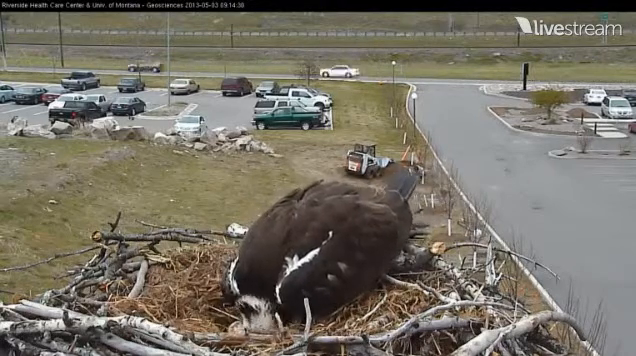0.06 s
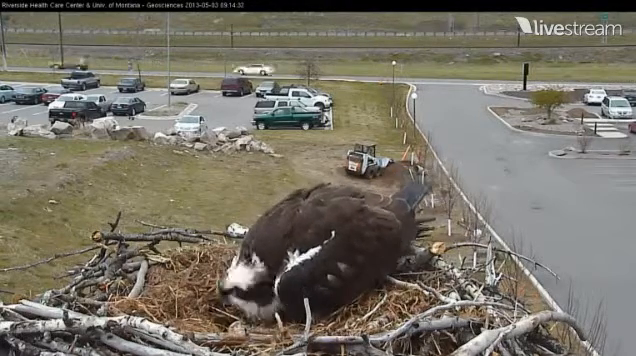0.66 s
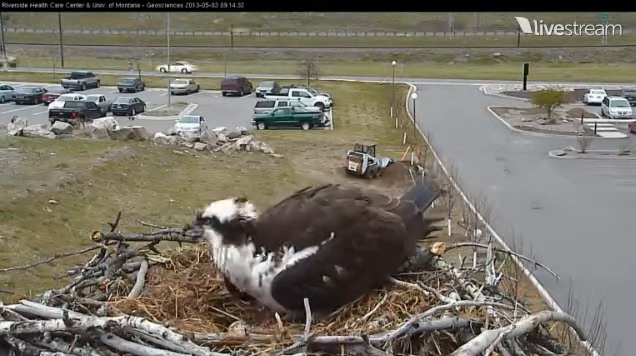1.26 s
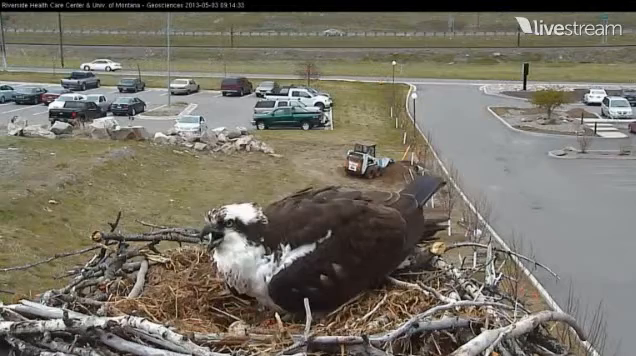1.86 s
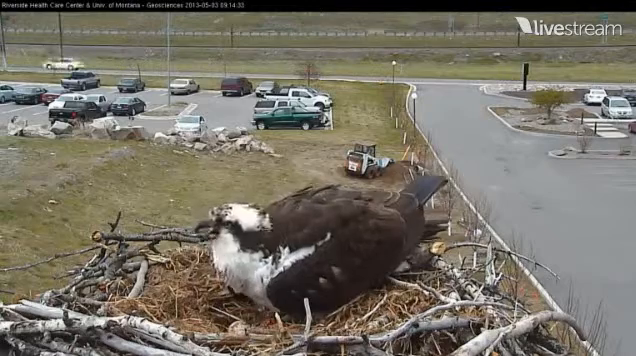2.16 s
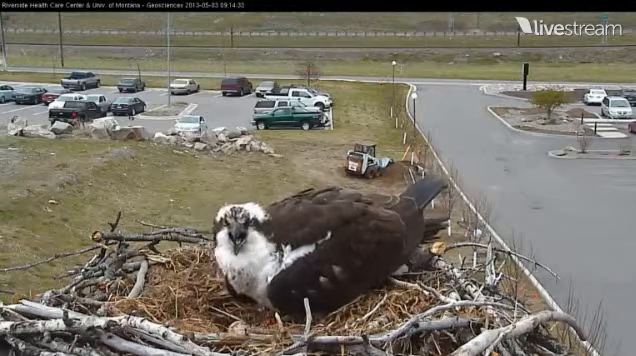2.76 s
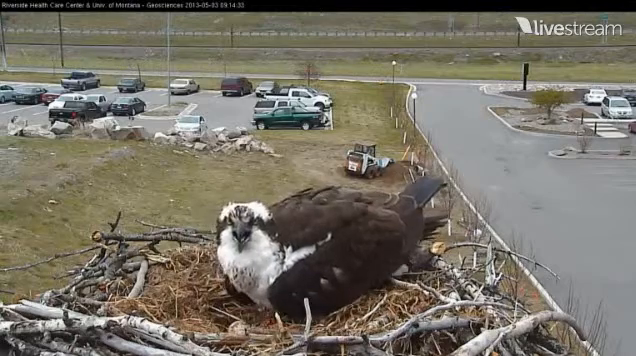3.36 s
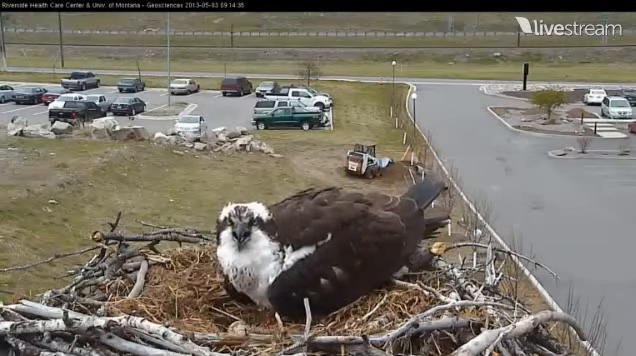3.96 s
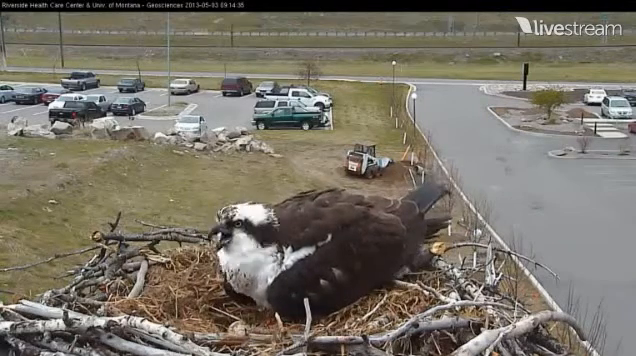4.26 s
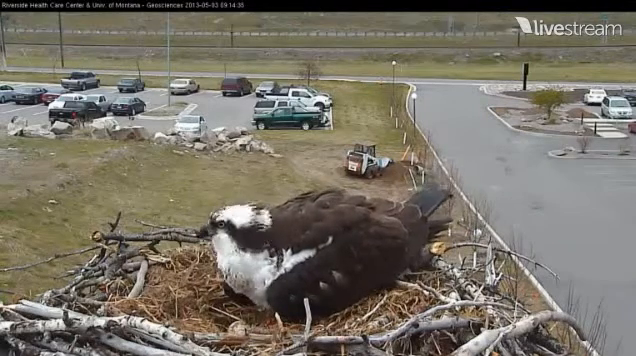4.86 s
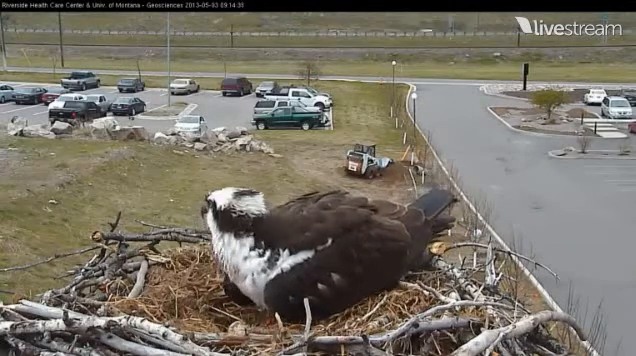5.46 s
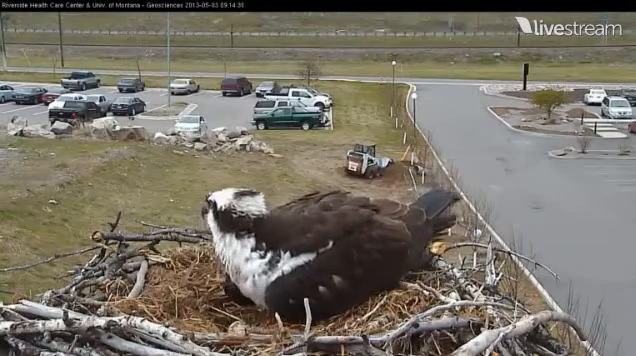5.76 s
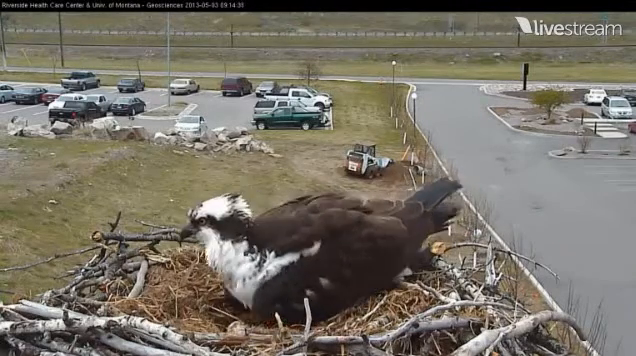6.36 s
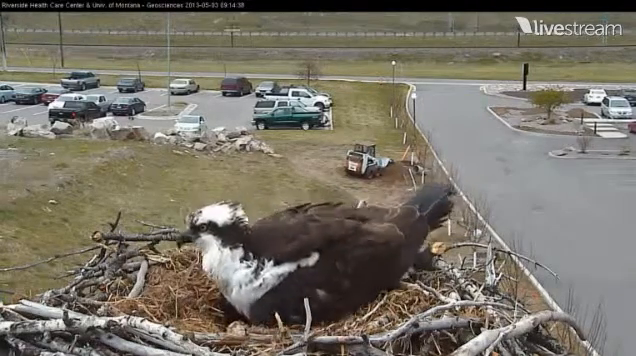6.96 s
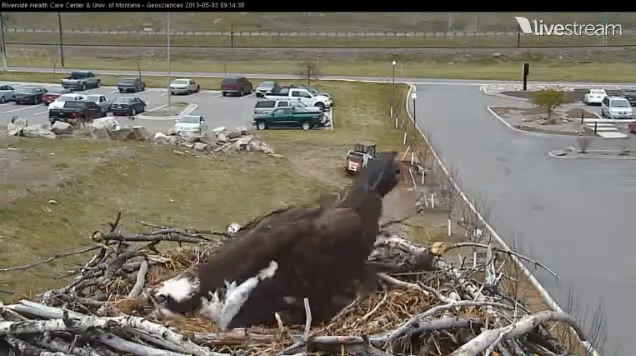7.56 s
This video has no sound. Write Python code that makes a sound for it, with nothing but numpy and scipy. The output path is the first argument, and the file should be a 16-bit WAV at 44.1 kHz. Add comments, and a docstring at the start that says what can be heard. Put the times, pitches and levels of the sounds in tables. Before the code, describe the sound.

Close to the microphone at an outdoor nest, an osprey whistles a quick run of sixteen high chirps, cracking at first, then louder and clearer. Sticks bump and rustle softly beneath it. Farther away, blackbirds gurgle and trill. After the osprey stops, small birds twitter, a blackbird gives a falling whistle and two hoarse calls follow, all over faint traffic and hum.

```python
"""At an osprey's nest, outdoors: up front and almost dry, the bird whistles sixteen chirps, each an
arch of pitch; in the first four its syrinx cracks between registers. Sticks bump and rustle under it.
Farther off, in light echo, blackbirds gurgle, trill and whistle while other birds mew, twitter and rasp.
The bed is a wash of distant traffic with a faint mains hum."""
import sys
import numpy as np
from scipy import signal
from scipy.fft import rfft, irfft
from scipy.io import wavfile

SR = 44100
rng = np.random.default_rng(int(sys.argv[2]) if len(sys.argv) > 2 else 0)


def dump_mix(stems):
    """Bounce the given channels to the path in sys.argv[1] as a 16-bit WAV at rate SR."""
    frames = np.atleast_2d(stems).T  # one column per channel
    limited = np.clip(frames, -1, 1)  # hard clip at full scale
    pcm = np.round(limited * 32767).astype(np.int16)
    wavfile.write(sys.argv[1], SR, pcm)


N = 338688
TIME = np.arange(N) / SR

# colour of the traffic wash: (frequency [Hz], relative level [dB])
TRAFFIC_SPECTRUM = [(20, -16.5), (40, -11), (62, -3.5), (90, -7), (180, -4.5), (330, -2), (750, -1.5),
                    (1400, -4), (2550, -5.5), (3150, -18), (4400, -19.5), (5500, -30.5), (8300, -45.5),
                    (15000, -60)]
# mains harmonics: (frequency [Hz], level [dB])
HUM_PARTIALS = [(59.9, -71.5), (119.8, -62.5), (179.7, -71.5), (239.7, -64.5), (359.5, -64.5), (479.4, -64),
                (599.2, -64.5), (719.1, -66), (838.9, -66), (958.8, -67.5)]
# harsh far calls: (start [s], end [s], top pitch [Hz], level [dB])
RASP_CALLS = [(6.89, 7.268, 1823, -49), (7.419, 7.734, 1810, -51)]
# colour of their hiss: (frequency [Hz], relative level [dB])
RASP_SPECTRUM = [(900, -12), (1300, 3), (2200, -.5), (3000, -13), (4200, -7.5), (5400, -19), (7000, -23),
                 (8200, -41), (12000, -70)]
# one nasal mew: (start [s], end [s], fundamental [Hz], sag [Hz/s], level [dB])
MEW_CALL = (0.37, 0.6, 326, 55.5, -49)
# its throat resonance: (frequency [Hz], relative level [dB])
MEW_FORMANT = [(3150, -25), (3520, .5), (3860, 2.5), (4180, -5), (4500, -7), (5150, -18), (5900, -34)]
# shape of a blackbird's long whistle: (time [s], pitch [Hz], level [dB])
WHISTLE_CONTOUR = [(6.53, 4782, -48), (6.56, 4904, -39.5), (6.612, 5130, -49), (6.71, 5030, -45),
                   (6.762, 4570, -35.5), (6.828, 4030, -41), (6.884, 3699, -45), (6.988, 3430, -46),
                   (7.06, 3310, -59)]
# each repeat of that shape: (start [s], time stretch [ratio], gain [dB], fade [dB/s])
WHISTLE_REPEATS = [(6.275, .9, -13, 47), (6.525, 0.98, -0.5, 1), (7.485, 0.97, -18.5, 5)]
# the flick that opens it: (length [s], start pitch [Hz], end pitch [Hz], base level [dB])
WHISTLE_FLICK = (0.03, 6450, 5400, -66)
# gurgles ahead of the second trill: (start [s], level [dB])
GURGLE_CUES = [(2.748, -44), (2.925, -44)]
# notes of a gurgle: (delay [s], length [s], start pitch [Hz], end pitch [Hz], gain [dB])
GURGLE_CLUSTER = [(0, .046, 1390, 1100, -4.5), (.022, 0.025, 2250, 2300, 2.5),
                  (.021, .026, 1955, 1900, -0.5)]
# lone slurs: (start [s], length [s], start pitch [Hz], end pitch [Hz], level [dB])
STRAY_NOTES = [(2.522, .153, 803, 811, -53.5), (2.869, .036, 2835, 2380, -39),
               (2.898, 0.026, 2834, 2870, -41.5), (2.914, 0.015, 2250, 2320, -39),
               (3.03, 0.026, 2340, 2490, -35.5), (3.05, .066, 4325, 4450, -41.5),
               (3.718, 0.025, 2206, 2380, -42), (6.229, .084, 4360, 4294, -52)]
# blackbird trills: (start [s], end [s], pulse rate [Hz], swell [s], level [dB], sharpness [exponent])
TRILL_CUES = [(-.05, .666, 42, .04, -54.5, 3.4), (3.04, 3.714, 43, 0.29, -39.5, .9)]
# notes in one pulse of each trill: (place in the pulse [0-1], pitch [Hz], width [Hz], gain [dB])
THIN_TRILL_NOTES = [(0.6, 4920, 163, -0.5), (0.13, 3020, 124, -4.5), (.45, 4600, 500, -2),
                    (0.94, 3600, 1200, -2.5)]
FULL_TRILL_NOTES = [(.28, 5100, 110.6, -1.5), (.9, 4000, 140, -2), (0.49, 2610, 110, -4.5),
                    (0.22, 4350, 200, -7.5), (.8, 4680, 940, -5), (0.49, 4500, 1500, -6.5),
                    (0.35, 3850, 950, -6.5)]
# weight shifting on the sticks: (start [s], length [s], centre [Hz], level [dB])
NEST_BUMPS = [(4.035, 0.04, 334, -45), (4.691, 0.02, 720, -43), (4.698, 0.083, 320, -50.5),
              (4.754, 0.073, 240, -47), (4.74, .2, 75, -59), (6.629, 0.033, 284, -46),
              (7.177, .07, 300, -51.5)]
# dry twigs: (start [s], length [s], level [dB])
TWIG_RUSTLES = [(0.03, .045, -56), (2.135, 0.084, -59), (3.892, 0.04, -55.5), (4.217, 0.051, -53.5),
                (4.451, 0.051, -52.5), (4.698, .09, -56.5)]
# osprey chirps: (start [s], end [s], start pitch [Hz], top pitch [Hz], mid-chirp level [dB])
OSPREY_CHIRPS = [(1.295, 1.373, 2310, 2820, -23.5), (1.472, 1.547, 2480, 2860, -21.5),
                 (1.651, 1.728, 2564, 2950, -19.5), (1.844, 1.92, 2620, 3030, -21.5),
                 (2.037, 2.111, 2623, 2954, -22), (2.231, 2.309, 2667, 2968, -22.5),
                 (2.425, 2.505, 2720, 3045, -21), (2.61, 2.698, 2880, 3150, -15),
                 (2.806, 2.893, 2850, 3098, -15.5), (2.996, 3.087, 2824, 3100, -15),
                 (3.194, 3.281, 2874, 3135, -15), (3.389, 3.481, 2880, 3132, -15),
                 (3.591, 3.69, 2890, 3144, -14.5), (3.7989, 3.893, 2876, 3150, -15),
                 (4.017, 4.108, 2900, 3138, -15), (4.247, 4.325, 2790, 3027, -19)]
# the voice opens over the series: (time [s], swell to mid-chirp [dB], octave against fundamental [dB])
VOICE_OPENING = [(1.51, 2, -20.5), (1.69, 2.5, -19.5), (1.88, 0, -13), (2.27, 0.5, -10.5), (2.46, 4, -11.5),
                 (2.65, 11, -12), (4.06, 11, -12), (4.29, 10, -10.5)]
# jumps to another register: (start [s], end [s], start pitch [Hz], held pitch [Hz], level [dB])
REGISTER_CRACKS = [(1.3, 1.333, 2336, 2390, -24), (1.3402, 1.362, 3185, 3170, -22.5),
                   (1.475, 1.493, 2550, 2594, -27.5), (1.492, 1.506, 2180, 2226, -23),
                   (1.507, 1.539, 2740, 3268, -19), (1.671, 1.718, 3120, 3403, -17.3),
                   (1.878, 1.905, 3480, 3570, -16.5)]
# the osprey's third partial, by where it lands: (frequency [Hz], level against fundamental [dB])
THIRD_PARTIAL_CURVE = [(6500, -28), (7200, -36), (8300, -32), (9400, -41), (9750, -54), (11000, -47.5)]
# faint lines between its partials: (multiple of the pitch [ratio], level against octave [dB])
HALF_HARMONICS = [(1.5, -32), (2.5, -34), (3.5, -50)]
# air rushing through the open beak: (frequency [Hz], relative level [dB])
BREATH_SPECTRUM = [(1200, -30), (2500, -7), (3300, -2.5), (4700, 1.5), (6200, -8.5), (7300, -18),
                   (8700, -11.5), (9500, -20), (10500, -31.5), (12300, -27), (14000, -50)]

def from_db(db):
    """Decibels to gain."""
    return 10 ** (np.asarray(db) / 20)

def rms_one(x):
    """Scale to unit power."""
    return x / np.sqrt(np.mean(x ** 2) + 1e-20)

def eq_gain(curve, hz):
    """Gain of an EQ curve drawn in dB over log frequency."""
    curve_hz, curve_db = np.transpose(curve)
    return from_db(np.interp(np.log(hz + 1e-9), np.log(curve_hz), curve_db))

def noise(gain_at):
    """Unit-power noise, coloured by a gain for each frequency."""
    hz = np.arange(N // 2 + 1) * SR / N
    return rms_one(irfft(rfft(rng.standard_normal(N)) * gain_at(hz), N))

def band(hz, width_hz):
    """A steep-sided noise band; at 0 Hz, a random drift for modulation."""
    return noise(lambda f: 1 / (1 + (2 * (f - hz) / width_hz) ** 4))

def phase_of(hz):
    """Running phase of a moving pitch."""
    return 2 * np.pi * np.cumsum(hz) / SR

def gate(t, start, end, rise, fall):
    """A smooth fade in and out between two times."""
    return np.sin(np.pi / 2 * np.clip(np.minimum((t - start) / rise, (end - t) / fall), 0, 1)) ** 2

def add(out, start, sound):
    """Mix a short sound in at its cue time."""
    i = int(start * SR)
    out[i:i + len(sound)] += sound[:max(N - i, 0)]

def slur(length, first_hz, last_hz, level_db):
    """A short whistled glide."""
    t = np.arange(int(length * SR)) / SR
    tone = np.sqrt(2) * np.sin(phase_of(np.interp(t, [0, length], [first_hz, last_hz])))
    return from_db(level_db) * gate(t, 0, length, length / 3, length / 3) * tone

def outdoors(x, wet_db, t60=.24):
    """Scattered echoes from ground, trees and walls follow the direct sound."""
    t = np.arange(SR // 2) / SR
    echoes = rng.standard_normal(len(t)) * (rng.random(len(t)) < .02)
    echoes *= from_db(-60 * t / t60) * (t > .004)
    return x + from_db(wet_db) * signal.fftconvolve(x, echoes / np.sqrt(np.sum(echoes ** 2)))[:N]

def traffic(level_db=-49):
    """Distant traffic blurs into a steady, dark wash."""
    return from_db(level_db) * noise(lambda f: eq_gain(TRAFFIC_SPECTRUM, f))

def mains_hum():
    """A faint, steady stack of mains harmonics."""
    return np.sqrt(2) * sum(from_db(level_db) * np.sin(2 * np.pi * hz * TIME + rng.uniform(0, 2 * np.pi))
                            for hz, level_db in HUM_PARTIALS)

def twitter(start_s=5.85, end_s=6.8, level_db=-65, count=24):
    """Small birds far away scatter brief slurred notes."""
    out = np.zeros(N)
    for when, pitch, bend, size in rng.random((count, 4)):
        hz = 3100 + 1600 * pitch
        note = slur(.0222 + .025 * size, hz, hz * (1 + .199 * (bend - .5)), level_db)
        add(out, start_s + when * (end_s - start_s), note)
    return out

def rasps(hiss_db=-2, throat_db=2, rise_s=.08, scoop_hz=230, sag_hz_per_s=1600, fade_db_per_s=14):
    """A hoarse voice: a wavering tone scoops up, then sinks and fades, wrapped in hiss."""
    out = np.zeros(N)
    roughness, waver_hz = 1 + .7 * band(0, 320), 75 * band(0, 200)
    hiss = from_db(hiss_db) * noise(lambda f: eq_gain(RASP_SPECTRUM, f))
    for start, end, top_hz, level_db in RASP_CALLS:
        age = np.clip(TIME, start, end) - start
        scoop = scoop_hz * np.maximum(1 - age / rise_s, 0) ** 2
        sag = sag_hz_per_s * np.maximum(age - rise_s, 0)
        throat = from_db(throat_db) * roughness * np.sin(phase_of(top_hz - scoop - sag + waver_hz))
        envelope = from_db(level_db - fade_db_per_s * age) * gate(TIME, start, end, .033, .066)
        out += envelope * (throat + hiss)
    return out

def mew(attack_s=.026, release_s=.1, jitter=.0022):
    """A narrow throat passes only the high harmonics of a low, sagging buzz."""
    start, end, first_hz, sag_hz_per_s, level_db = MEW_CALL
    hz = first_hz - sag_hz_per_s * (np.clip(TIME, start, end) - start)
    phase = phase_of(hz * (1 + jitter * band(0, 200)))
    voice = sum(eq_gain(MEW_FORMANT, k * hz) * np.sin(k * phase + rng.uniform(0, 2 * np.pi))
                for k in range(10, 19))
    return from_db(level_db) * gate(TIME, start, end, attack_s, release_s) * rms_one(voice)

def blackbird_whistles(waver_hz=15, flicker_db=1.5, octave_db=-35, edge_s=.012, flick_follows=.3):
    """A near-pure whistle, repeated: a flick, a held note, then a fall that picks up a faint octave."""
    out = np.zeros(N)
    waver, flicker = waver_hz * band(0, 203), flicker_db * band(0, 40)
    shape_s, shape_hz, shape_db = np.transpose(WHISTLE_CONTOUR)
    for start, stretch, gain_db, fade_db_per_s in WHISTLE_REPEATS:
        times = start + edge_s / 2 + (shape_s - shape_s[0]) * stretch
        hz = np.interp(TIME, times, shape_hz)
        phase = phase_of(hz + waver)
        octave = from_db(octave_db) / (1 + (hz / 4100) ** 20)
        tone = np.sqrt(2) * (np.sin(phase) + octave * np.sin(2 * phase))
        contour_db = np.interp(TIME, times, shape_db - fade_db_per_s * (times - start))
        edges = gate(TIME, start, times[-1] + 2 * edge_s, edge_s, 2 * edge_s)
        out += from_db(gain_db + flicker + contour_db) * edges * tone
        add(out, start - WHISTLE_FLICK[0] / 2, from_db(flick_follows * gain_db) * slur(*WHISTLE_FLICK))
    return out

def blackbird_gurgles(start_s=2.71, end_s=3.1, hiss_db=-51, tick_db=-45, tick_delay_s=.024, tick_s=.016):
    """Liquid notes lead into the second trill over a swelling hiss; a few stray notes sound alone."""
    patchy_hiss = rms_one(band(4400, 1700) * from_db(3 * band(0, 50)))
    out = from_db(hiss_db) * gate(TIME, start_s, end_s, rise=.3, fall=.04) ** .5 * patchy_hiss
    tick = from_db(tick_db) * band(1800, 1500)   # a rough transient on the upper notes
    for start, level_db in GURGLE_CUES:
        out += gate(TIME, start + tick_delay_s, start + tick_delay_s + tick_s, .001, tick_s) * tick
        for delay, length, first_hz, last_hz, note_db in GURGLE_CLUSTER:
            add(out, start + delay, slur(length, first_hz, last_hz, level_db + note_db))
    for start, *note in STRAY_NOTES:
        add(out, start, slur(*note))
    return out

def blackbird_trills(clear_width_hz=170):
    """The two sides of the syrinx trade buzzy notes; narrow ones are tonal, wide ones hoarse."""
    out = np.zeros(N)
    for cue, notes in zip(TRILL_CUES, (THIN_TRILL_NOTES, FULL_TRILL_NOTES)):
        start, end, pulse_hz, swell_s, level_db, sharpness = cue
        effort = from_db(level_db) * gate(TIME, start, end, swell_s, .03) ** .5
        for place, hz, width_hz, note_db in notes:
            pulse = abs(np.cos(np.pi * ((TIME - start) * pulse_hz - place))) ** (2 * sharpness)
            clarity = 1 / (1 + (width_hz / clear_width_hz) ** 4)
            tone = np.sqrt(2) * np.sin(phase_of(hz + width_hz / 4 * band(0, 122)))
            voice = np.sqrt(clarity) * tone + np.sqrt(1 - clarity) * band(hz, width_hz)
            out += effort * pulse * from_db(note_db) * voice
    return out

def nest(twig_hz=4400, twig_width_hz=1400, attack_s=.0039):
    """The osprey shifts its weight: dull bumps from the stick pile, grainy rustles from its lining."""
    out = np.zeros(N)
    for start, length, hz, level_db in NEST_BUMPS:
        envelope = gate(TIME, start, start + length, attack_s, length * .53)
        out += from_db(level_db) * envelope * band(hz, hz * .69)
    twigs = rms_one(band(twig_hz, twig_width_hz) * from_db(2 * band(0, 400)))
    for start, length, level_db in TWIG_RUSTLES:
        out += from_db(level_db) * gate(TIME, start, start + length, length / 3, length / 2) * twigs
    return out

def osprey(attack_s=.004, release_s=.008, break_s=.003, jitter=.002, catch_jitter=.004,
           break_jitter=.014, unstable_s=.0056, air_db=-46, scratch_db=12, scratch_s=.0082):
    """Each chirp is an arch: pressure peaks in the middle, where the whistle is highest and loudest."""
    waver, flutter_db, doubling = band(0, 1500), .15 * band(0, 300), band(0, 120)
    # the syrinx turns rough around the end of each crack
    unstable = sum(np.exp(-abs(TIME - end) / unstable_s) for _, end, *_ in REGISTER_CRACKS).clip(0, 1)
    air = from_db(air_db) * noise(lambda f: eq_gain(BREATH_SPECTRUM, f))

    def note(start, end, first_hz, middle_hz, last_hz, level_db, swell_db, tilt_db, octave_db, close_s):
        """Cue time and sound of one note: whistled partials plus the air in the beak."""
        opens, closes = start - attack_s / 2, end + close_s / 2
        span = slice(int(opens * SR), int(closes * SR))
        t = TIME[span]
        arch = np.clip(2 * (t - start) / (end - start) - 1, -1, 1)   # -1 at the start, +1 at the end
        rise_hz = (first_hz - middle_hz) * abs(arch) ** 1.9
        fall_hz = (last_hz - middle_hz) * abs(arch) ** 2.7
        hz = middle_hz + np.where(arch < 0, rise_hz, fall_hz)
        # each note catches with a scratch before the whistle settles
        catch = np.exp(-(t - opens) / scratch_s)
        breath = from_db(level_db + scratch_db * np.maximum(catch, unstable[span])) * air[span]
        roughness = jitter + catch_jitter * catch + break_jitter * unstable[span]
        phase = phase_of(hz * (1 + roughness * waver[span]))
        loudness = from_db(level_db - swell_db * arch ** 2 + tilt_db * arch / 2 + flutter_db[span])
        core = loudness * (np.cos(phase) + eq_gain(THIRD_PARTIAL_CURVE, 3 * hz) * np.cos(3 * phase))
        # the octave swells less and dies first as the syrinx relaxes; the top partials grow as its cube
        octave_gain = from_db(level_db + octave_db - .37 * swell_db * arch ** 2)
        octave_gain *= gate(t, opens, closes, attack_s, (end - start) * .18)
        top = from_db(23) * octave_gain ** 3 * (np.cos(4 * phase) + from_db(-17) * np.cos(5 * phase))
        shine = octave_gain * np.cos(2 * phase) + top
        # at full pressure alternate cycles differ a little, giving faint lines between the partials
        halves = sum(from_db(half_db) * np.cos(k * phase) for k, half_db in HALF_HARMONICS)
        grit = octave_gain * (1 - arch ** 2) ** 2 * (1 + doubling[span] / 2) * halves
        # a weakly blown chirp, swelling less than 3 dB, takes longer to speak
        speak_s = attack_s + .0035 * np.clip(1 - swell_db / 3, 0, 1)
        envelope = gate(t, opens, closes, speak_s, close_s)
        return opens, envelope * (np.sqrt(2) * (core + shine + grit) + breath)

    out = np.zeros(N)
    times, swells_db, octaves_db = np.transpose(VOICE_OPENING)
    for start, end, first_hz, top_hz, level_db in OSPREY_CHIRPS:
        middle = (start + end) / 2
        last_hz = 2667 + .43 * (first_hz - 2860)   # a chirp that starts lower ends a little lower
        add(out, *note(start, end, first_hz, top_hz, last_hz, level_db,
                       swell_db=np.interp(middle, times, swells_db), tilt_db=-2,
                       octave_db=np.interp(middle, times, octaves_db), close_s=release_s))
    # in a crack the arch cuts out and a flatter, purer register takes its place
    cutouts = sum(gate(TIME, start - attack_s / 2 - break_s, end + break_s / 2, break_s, break_s)
                  for start, end, *_ in REGISTER_CRACKS)
    out *= 1 - np.clip(cutouts, 0, 1)
    for start, end, first_hz, held_hz, level_db in REGISTER_CRACKS:
        add(out, *note(start, end, first_hz, held_hz, .972 * held_hz, level_db,
                       swell_db=3, tilt_db=1.5, octave_db=-22.5, close_s=break_s))
    return out

def scene():
    """Mono mix, back to front: the bed, the far birds in echo, the osprey almost dry."""
    bed = traffic() + mains_hum()
    far = twitter() + rasps() + mew() + blackbird_whistles() + blackbird_gurgles() + blackbird_trills()
    near = nest() + osprey()
    return (bed + outdoors(far, wet_db=-10) + outdoors(near, wet_db=-34.5))[None]

def record(dry, cutoff_hz=15500):
    """A steep low-pass trims the top of the mix."""
    return signal.sosfilt(signal.ellip(10, .1, 80, cutoff_hz, fs=SR, output="sos"), dry)


dry = scene()
out = record(dry)
dump_mix(out)
```